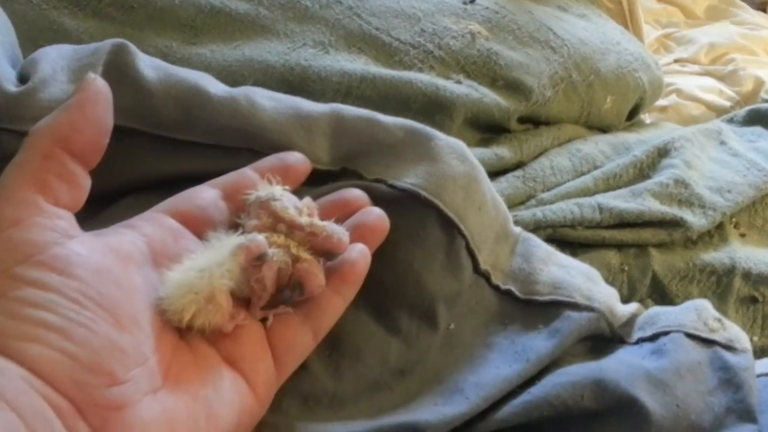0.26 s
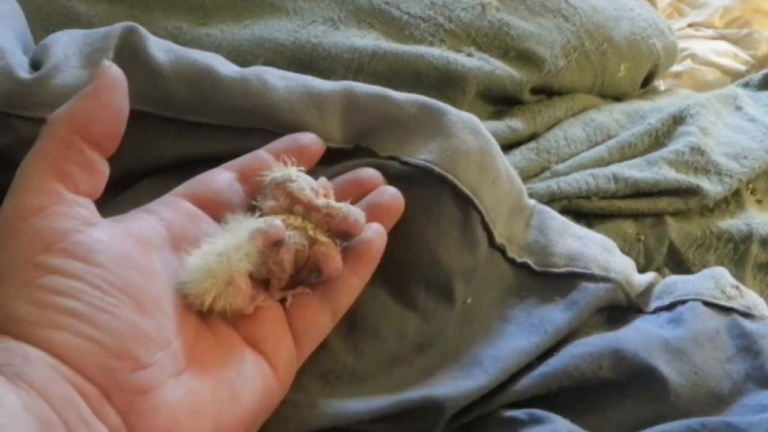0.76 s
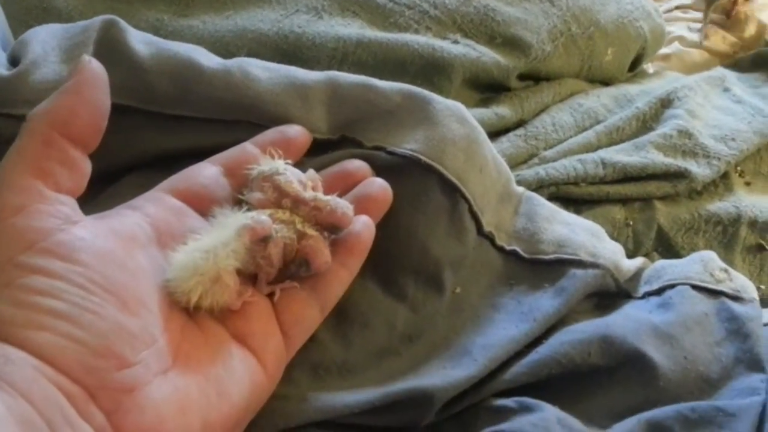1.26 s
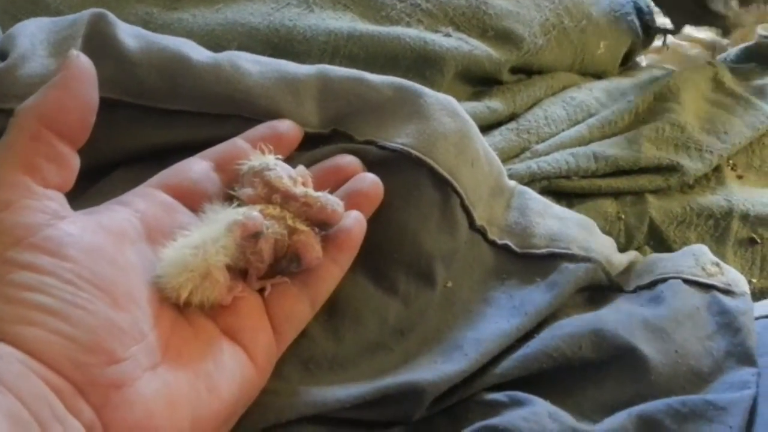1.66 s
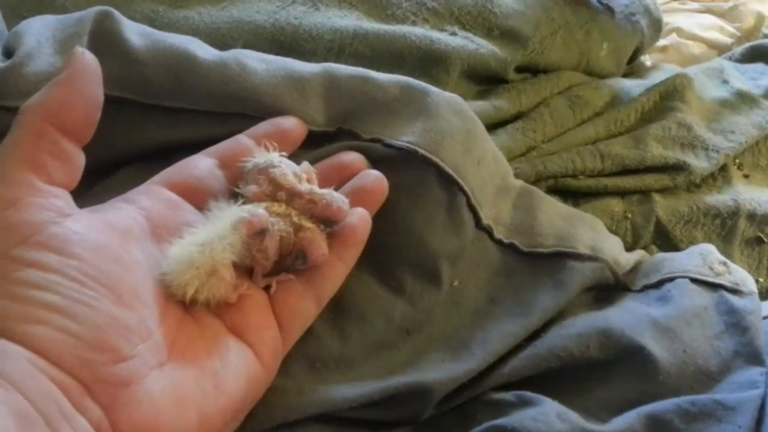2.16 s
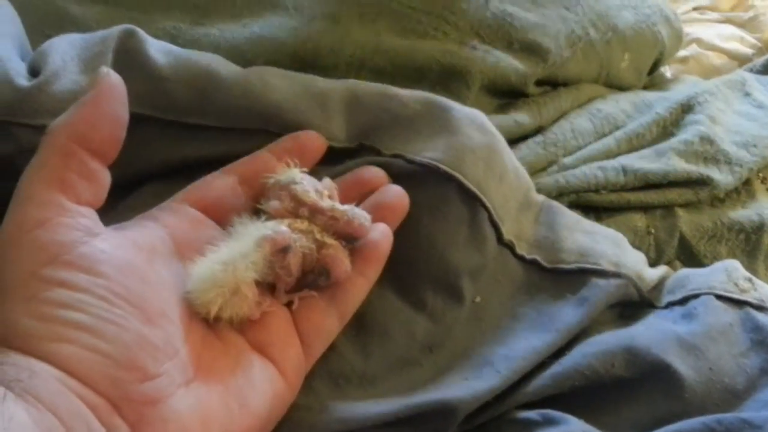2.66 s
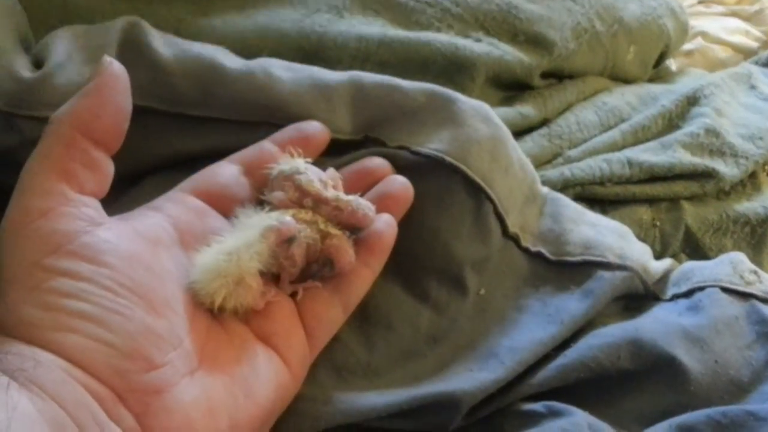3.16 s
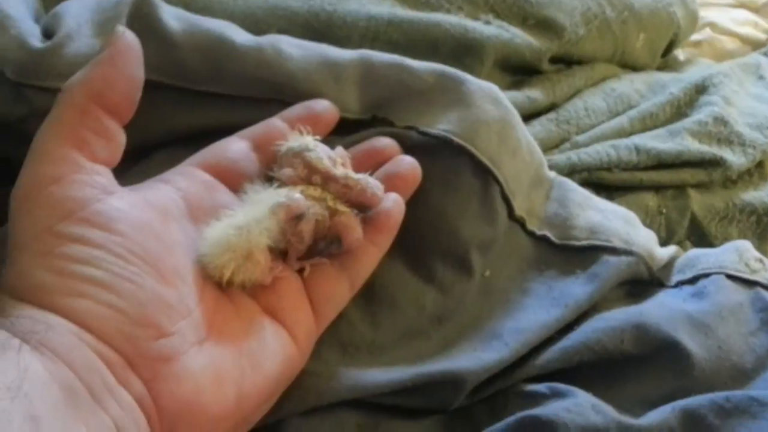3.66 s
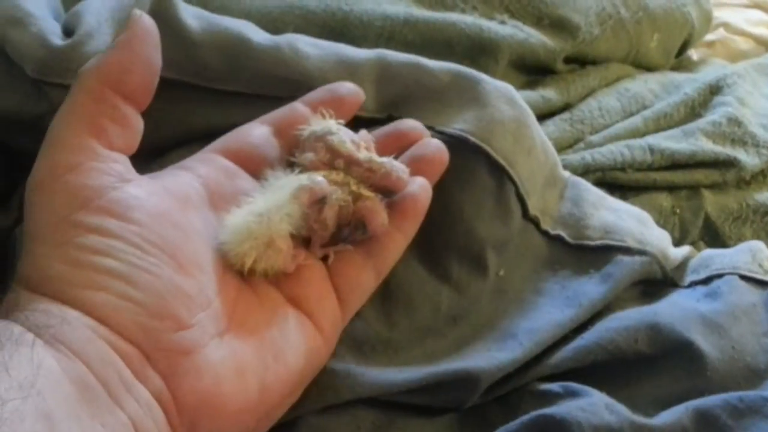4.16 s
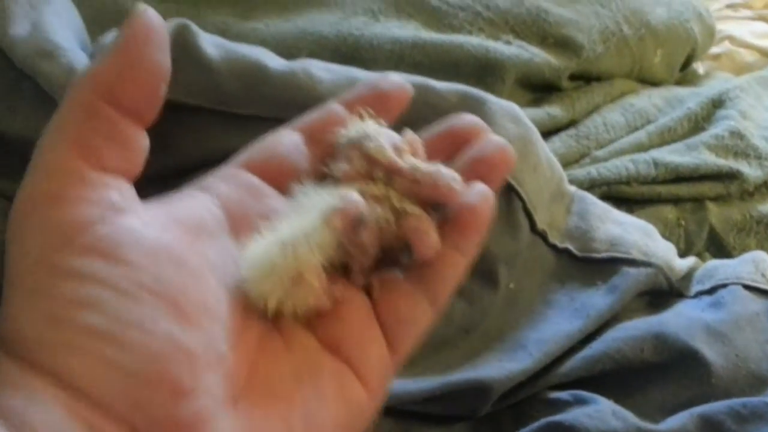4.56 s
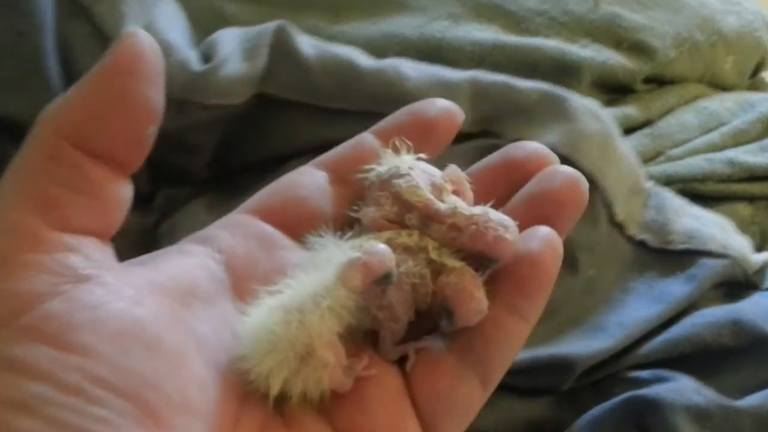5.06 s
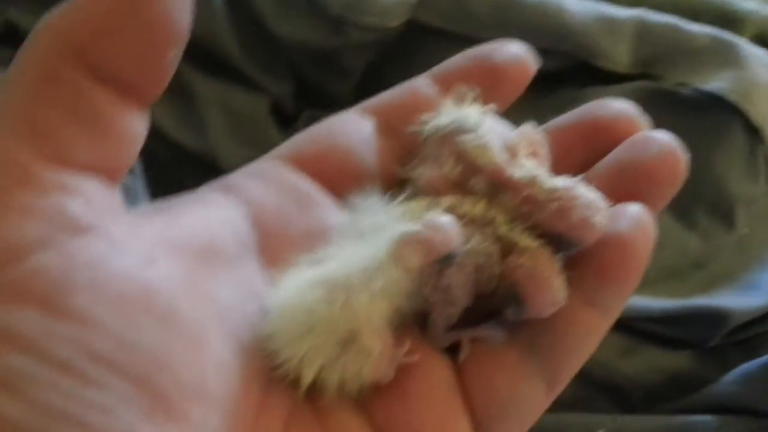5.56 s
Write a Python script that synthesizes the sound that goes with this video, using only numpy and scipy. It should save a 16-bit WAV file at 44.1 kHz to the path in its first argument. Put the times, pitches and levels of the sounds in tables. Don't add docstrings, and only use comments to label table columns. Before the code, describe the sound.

Tiny hatchlings chirp in a soft-furnished room. Light ticks and a brisk cloth rub come first, then two overlapping rising cheeps, followed by single stepped chirps, a close pair midway, a rougher squawk and a loud last call. Fabric then rustles near the handheld microphone. Low rumble swells with each sound and sinks between.

```python
import sys
import numpy as np
from scipy import signal
from scipy.fft import rfft, irfft, next_fast_len
from scipy.io import wavfile
from scipy.ndimage import uniform_filter1d, minimum_filter1d, map_coordinates

SR = 44100
rng = np.random.default_rng(int(sys.argv[2]) if len(sys.argv) > 2 else 0)


def waveform_to_disk(signal):
    frames = np.transpose(np.atleast_2d(signal))
    scaled = np.clip(frames, -1, 1) * 32767
    samples = np.round(scaled).astype(np.int16)
    wavfile.write(sys.argv[1], SR, samples)


def voltage_ratio(decibels):
    exponent = np.asarray(decibels, float) / 20
    return 10 ** exponent


N = 256614

# (frequency [Hz], density [dB per Hz])
RUMBLE_SPECTRUM = [(15, -45.5), (25, -23), (90, -4), (119, -7.5), (146, -5), (321, -2.5), (375, -2.5),
                   (682, -10.5), (1500, -17), (1950, -27.5), (3300, -120)]
# (frequency [Hz], density [dB per Hz])
HISS_SPECTRUM = [(2650, -39.5), (4500, -5.5), (6500, -4), (7010, 0.5), (7370, 1), (8750, -9), (14000, -17),
                 (14700, -15.5), (15000, -33)]
# (frequency [Hz], density [dB per Hz])
DULL_SPECTRUM = [(530, -36), (900, -5.5), (1370, -13.5), (1970, -2), (2160, -1.5), (2660, -3.5),
                 (5000, -4.5), (6500, -27.5), (11000, -120)]
# (frequency [Hz], correlation [-1 to 1])
LIKENESS = [(60, 0.66), (180, -0.025), (550, 0.16), (1650, -0.069), (4970, -0.51), (15000, 0.0)]
# (frequency [Hz], left minus right [dB])
NOISE_BALANCE = [(60, -4.5), (180, 2), (550, 3.5), (1650, 10), (4970, 2), (15000, -8)]
# (frequency [Hz], left minus right [dB])
BIRD_BALANCE = [(60, -12.5), (120, -3), (240, 1.5), (480, -1), (950, -10.5), (1890, 9.5), (3770, 9),
                (7520, -5), (15000, -21.5)]
# (frequency [Hz], t60 [s])
ROOM_DECAY = [(1500, 0.22), (2300, 0.27), (3100, 0.33), (4500, 0.27), (6000, 0.32), (10000, 0.17)]
# (time [s], level [dB])
HAND = [(0, -1), (.55, -2.5), (.7, 2.5), (1.2, 5), (1.5, 5.5), (1.9, -3.2), (2.3, 3.5), (2.7, -1),
        (3.35, -3.5), (3.62, 5.5), (4, -3.5), (4.3, -0.5), (4.5, -1.5), (5.1, -5), (5.62, 3.5), (5.78, 3)]
# (time [s], half width [s], level shift [dB])
BASS_DIPS = [
    (.8, .03, -28),
    (.85, 0.089, -20),
    (2.77, .035, -28.5),
    (2.82, 0.21, -17.5),
    (3.28, 0.057, -6),
    (4.63, 0.095, -13.5),
]
# (time [s], level [dB],
# dull far part over near hiss [dB])
CLOTH_MOVES = [(0, -62.5, 9.5), (.13, -64.5, 4.5), (.196, -83.5, .1), (1.3, -79.5, 13.5), (1.434, -71, 6),
               (1.52, -65.5, 9), (1.79, -80.5, -4.7), (4.13, -95, 8.5), (4.18, -62.5, -18),
               (4.29, -63.5, -29.5), (4.47, -54.5, -16), (4.96, -52, -16.5), (5.154, -50.5, -18.5),
               (5.206, -45.5, -10.5), (5.246, -52.5, -15.5), (5.456, -55.5, -16), (5.56, -60.5, -1.5),
               (5.819, -58.5, -2.5)]
# (time [s], peak level [dB], centre [Hz], left minus right [dB], t60 [s])
CLAW_TICKS = [(0.1271, -47.5, 1740, 11, 0.037), (0.2049, -42, 5500, 1.5, 0.012),
              (0.2889, -39, 1610, -4.5, 0.04), (0.3783, -45.5, 7100, -10.5, 0.036),
              (0.439, -46.5, 2890, -2, 0.032), (0.5079, -33.5, 6800, -13, 0.06),
              (1.8203, -43, 6760, 4, 0.0532), (1.8735, -42, 5070, 2.5, 0.014),
              (2.0289, -53, 3150, 5.5, 0.047), (2.4588, -37.5, 3030, 2, 0.028),
              (2.5157, -42, 6730, 1, 0.04), (4.0478, -41, 6880, -4.5, 0.058),
              (4.1788, -48, 7170, -14.5, 0.03), (4.251, -43.5, 6840, -1, 0.014),
              (5.1984, -43, 7130, -12, 0.028), (5.5792, -37.5, 5050, 10, 0.0144),
              (5.6494, -50, 5030, 15, 0.038), (5.7309, -45, 6900, 9, 0.027)]
# (frequency [Hz], level [dB], t60 [s])
WIRE_RING = [(5500, 0.5, 0.016), (8370, -5, 0.092), (11800, -15, 0.071), (3020, -16.5, 0.037)]
# (frequency [Hz], level [dB])
BEAK_COLOUR = [(1400, 0), (3000, -2), (4500, 2.5), (6000, -6), (7600, -7.5), (9000, -19), (10500, -35.5),
               (12500, -32), (15000, -49)]
# (start [s], first leap, high leap and drop after the start [s], lowest pitch [Hz])
STEPPED_CALLS = [
    (1.008, .029, .105, .157, 1600),
    (2.143, .038, .107, .159, 1640),
    (2.763, .032, .111, .162, 1600),
    (3.534, .021, .088, .131, 1600),
    (4.494, .029, .081, .147, 1750),
]
# (level [dB], slip after the first leap [Hz], top of the middle register [Hz],
# pitch held after the drop [Hz], level there [dB])
CALL_PHRASING = [
    (-3, 280, 2450, 2150, -3),
    (-4.5, 18, 2260, 2100, -1),
    (.1, 14, 2500, 2200, -0.5),
    (-0.07, 270, 2550, 2270, 4),
    (3, 120, 2400, 2480, -3),
]
# (level [dB], overtone strength [dB])
STAGE_LEVELS = [(-28, -11), (-25, -8), (-20, -5.5), (-26.5, -3.5), (-20, -10.5), (-18, -2), (-12.5, -5),
                (-16, -13.5), (-11.5, -12.5), (-19, -1.5), (-21.5, -10), (-21.5, -10.5), (-30.5, -5)]
STAGE_PITCH = [0, 1770, 2090, 2110, 2140, 0, 2950, 3085, 3115, 2500, 0, 0, 1800]
# (time [s], pitch [Hz], level [dB], overtone strength [dB])
CLIMB_CALL = [
    (.65, 1801, -18, -6),
    (.68, 2006, -17, -6.5),
    (0.729, 2469, -19, -12),
    (.745, 2725, -11, 2),
    (0.764, 3015, -22.5, -4.5),
    (.857, 3156, -23, -3),
    (.866, 3435, -15, 0.5),
    (.885, 3654, -21, 6.5),
    (0.926, 3585, -27.5, -8),
]
ANSWER_CALL = [
    (0.729, 1369, -26.5, -12),
    (.74, 1864, -26, 7.5),
    (0.777, 1950, -21, -2.5),
    (.792, 2120, -18.5, -3),
    (.815, 2590, -21.5, 2.2),
    (0.859, 2638, -35, 8),
    (0.899, 2932, -26.5, 1.6),
    (0.925, 2100, -24.5, 0),
]
ARCH_CALL = [
    (2.634, 1558, -27, -3.5),
    (2.662, 1878, -19.5, 1.5),
    (2.68, 2305, -18, -4),
    (2.718, 2363, -14.5, -9.5),
    (2.726, 2896, -14, -2.5),
    (2.76, 3264, -17, -13.5),
    (2.79, 3382, -16.5, -30),
    (2.82, 3196, -21, -13.5),
    (2.845, 2690, -11.5, -15.5),
]
SQUAWK_CALL = [
    (3.197, 1696, -22.5, 1.5),
    (3.23, 1630, -26.5, 0.5),
    (3.28, 2013, -17, 2),
    (3.3, 2322, -26, -1.5),
    (3.315, 2775, -15, -4.5),
    (3.35, 2841, -19, -19),
    (3.378, 2874, -17, -16),
    (3.392, 1855, -16, -2),
    (3.41, 1754, -42, 8),
]
FAR_CALL = [
    (-.06, 2300, -46, -8),
    (-.04, 2950, -42, -28),
    (-.01, 2700, -44.5, -6),
    (0, 2100, -63, 0.5),
]
PEEP_CALL = [
    (4.046, 4600, -47, 5),
    (4.051, 3600, -45, 13),
    (4.068, 3250, -52, 9),
]
# (roughness [0-1], third overtone [dB],
# loss per overtone above the third [dB], room [dB])
VOICES = [(.25, -6, .1, 4), (.25, 6.5, 4.5, 4), (.8, 0, -0.2, 3), (.45, -1.5, 0.5, 1.8), (.4, -5, 1, 0.7),
          (0.5, -3, -0.55, 2.1), (.5, -2.5, 0.6, 2.5), (.85, -8, 5.5, 0.5), (0.5, -2, 1, 0.5),
          (0.1, -8, .1, -7), (.45, 0.5, -0.5, 3.55)]


def unit(x):
    return x / np.sqrt(np.mean(x ** 2) + 1e-20)


def along(points, hz):
    f, v = np.transpose(points)
    return np.interp(np.log(hz + 1), np.log(f + 1), v)


def level(rows, axis=1):
    rows = np.transpose(rows)
    return voltage_ratio(np.interp(np.arange(N) / SR, rows[0], rows[axis]))


def wobble(rate, size=N):
    knots = rng.standard_normal(int(size * rate / SR) + 4)
    return map_coordinates(knots, [np.arange(size) * rate / SR])


def filtered(x, response):
    m = next_fast_len(x.shape[-1] + 8192)
    spectrum = rfft(x, m) * response(np.fft.rfftfreq(m, 1 / SR))
    return irfft(spectrum, m)[..., :x.shape[-1]]


def lean(x, balance):
    return filtered(x, lambda hz: voltage_ratio(along(balance, hz) * np.array([[.5], [-.5]])))


def rush(spectrum, patchy_db):
    z = signal.stft(rng.standard_normal((2, N)), nperseg=512)[2]
    patches = uniform_filter1d(rng.standard_normal(z.shape[1:]), 6, 0)
    patches = uniform_filter1d(patches, 10, 1)
    pair = signal.istft(z * voltage_ratio(patchy_db * unit(patches)), nperseg=512)[1][:, :N]

    def mid_side(hz):
        turn = np.arccos(np.clip(along(LIKENESS, hz), -1, 1)) / 2
        return voltage_ratio(along(spectrum, hz)) * [np.cos(turn), np.sin(turn)]

    mid, side = filtered(pair, mid_side)
    return unit(lean(np.array([mid + side, mid - side]), NOISE_BALANCE))


def add(mix, x, wet_db, gap, s):
    hz, t, z = signal.stft(rng.standard_normal((2, SR // 2)), SR, nperseg=256)
    tail = signal.istft(z * voltage_ratio(-60 * t / along(ROOM_DECAY, hz)[:, None]), SR, nperseg=256)[1]
    after = np.arange(tail.shape[1])
    tail *= np.clip(after / (gap * SR), 0, 1) ** 2
    tail *= 1 + 1.7 * voltage_ratio(-60 * after / (.09 * SR))
    tail *= voltage_ratio(wet_db) / np.linalg.norm(tail[0])
    tail[[0, 1], [0, 12]] = 1
    both = signal.fftconvolve(np.atleast_2d(x), tail, axes=1)
    start = SR + round(s * SR)
    mix[:, start:start + both.shape[1]] += both


def floor(heard, hiss, dull):
    gate_s, gate_hz, shut_db, open_db = 0.024, 3760, -85, -39
    sensed = filtered(heard, lambda hz: 1 / np.hypot(1, hz / gate_hz))
    power = uniform_filter1d((sensed ** 2).mean(0), size=round(gate_s * SR))
    power_db = 10 * np.log10(np.abs(power) + 1e-12)
    opening = np.clip((power_db - shut_db) / (open_db - shut_db), 0, 1)

    def through(low_db, high_db):
        return voltage_ratio(low_db + (high_db - low_db) * opening)

    hum = voltage_ratio(-8 + 2 * wobble(6)) * np.sin(2 * np.pi * 120 * np.arange(N) / SR)
    unrest = level(HAND) * voltage_ratio(2.2 * wobble(5.5) + 0.71 * wobble(21))
    rumble = through(-72.5, -55) * unrest * (rush(RUMBLE_SPECTRUM, patchy_db=2.5) + hum)
    return rumble + through(-79, -53) * hiss + through(-76, -54.5) * dull


def cloth(hiss, dull):
    rub_s, rub_db, rub_dull_db, hold_s, release_s = .508, -35, -13, .02, .1
    late = np.arange(N) / SR - rub_s
    rub = (late > 0) * voltage_ratio(rub_db - 30 * np.clip(late - hold_s, 0, None) / release_s)
    slow = level(CLOTH_MOVES) * voltage_ratio(0.61 * wobble(22))
    far = slow * level(CLOTH_MOVES, axis=2) + rub * voltage_ratio(rub_dull_db)
    return (slow + rub) * hiss + far * dull


def ticks():
    mix = np.zeros((2, N + 3 * SR))
    t = np.arange(SR // 5) / SR
    for k, (s, db, hz, pan_db, t60) in enumerate(CLAW_TICKS):
        def colour(f):
            return (0.29 + 1 / np.hypot(1, (f - hz) / 1500)) * f ** 2 / (f ** 2 + 1500 ** 2)

        puff = unit(filtered(rng.standard_normal(len(t)), colour)) * voltage_ratio(-60 * t / t60)
        if k == 1:
            for f, ring_db, ring_s in WIRE_RING:
                puff += 3.6 * voltage_ratio(ring_db - 60 * t / ring_s) * np.sin(2 * np.pi * f * t)
        pan = pan_db * np.array([[.5], [-.5]])
        add(mix, puff * voltage_ratio(db - 10.5 + pan), wet_db=7.0, gap=0.0013, s=s)
    return mix[:, SR:SR + N]


def stepped(s, first, leap, drop, low_hz, db, slip_hz, middle_hz, tail_hz, tail_db):
    leap_s, slip_s, settle_s, fade_s, call_s = .007, .009, .014, .011, .2
    landed = first + leap_s
    after = [0, first, landed, landed + slip_s, landed + 2 * slip_s,
             leap, leap + leap_s, leap + leap_s + settle_s,
             drop, drop + leap_s, drop + leap_s + settle_s, call_s - fade_s, call_s]
    stages = np.column_stack([s + np.array(after), STAGE_PITCH, np.add(STAGE_LEVELS, [db, 0])])
    stages[[0, 3, 5, 10, 11], 1] += [low_hz, -slip_hz, middle_hz, tail_hz, tail_hz]
    stages[9:, 2] += tail_db
    return stages


def voice(call, rough, third_db, loss_db):
    s, hz, db, over_db = np.transpose(call)
    t = np.arange(s[0], s[-1], 1 / SR)
    size = len(t)
    breath_db = -28 + 15 * rough
    glide = uniform_filter1d(np.interp(t, s, hz), size=70)
    low = np.clip((1880 - glide) / 100, 0, 1)
    steadiness = np.where(glide > 3000, .6, 1)
    pitch = glide * (1 + .045 * rough * steadiness * wobble(260, size=size))
    phase = 2 * np.pi * np.cumsum(pitch) / SR
    tilt_db = -1.5 + 9 * np.clip(pitch / 1000 - 1.9, 0, None)
    tone = np.sin(phase) * voltage_ratio(along(BEAK_COLOUR, pitch))
    for k in range(2, 9):
        over = np.interp(t, s, over_db) - tilt_db * min(k - 2, 2)
        over += along(BEAK_COLOUR, k * pitch) + 4.0 * wobble(45, size=size)
        if k == 2:
            over -= 5 * low
        if k == 3:
            over += third_db + 10 * low
        over -= loss_db * max(k - 3, 0)
        if k == 2:
            over += 0
        fray = 1 + voltage_ratio(breath_db + 3.5 * k) * wobble(1500, size=size)
        tone += voltage_ratio(over) * unit(fray) * np.sin(k * phase) * (k * pitch < SR / 2)
    tone *= 1 + voltage_ratio(breath_db) * wobble(2200, size=size)
    edge = np.clip(np.minimum((t - s[0]) / 0.0062, (s[-1] - t) / 0.0034), 0, 1)
    swing_db = 2.6 * rough * wobble(149.2, size=size)
    return edge * tone * voltage_ratio(np.interp(t, s, db) + swing_db)


def whistles():
    mix = np.zeros((2, N + 3 * SR))
    calls = [stepped(*row, *way) for row, way in zip(STEPPED_CALLS, CALL_PHRASING)]
    calls += [FAR_CALL, CLIMB_CALL, ANSWER_CALL, ARCH_CALL, SQUAWK_CALL, PEEP_CALL]
    calls = sorted(calls, key=lambda c: c[0][0])
    for call, (rough, third_db, loss_db, room_db) in zip(calls, VOICES):
        add(mix, voice(call, rough, third_db, loss_db), wet_db=room_db, gap=0.0053, s=call[0][0])
    small = filtered(mix[:, SR:SR + N], lambda f: 1 / (1 + (1400 / (f + 1)) ** 12))
    return lean(small, BIRD_BALANCE)


def gated(x, open_db, slope):
    power = uniform_filter1d((x ** 2).mean(0), size=1500)
    db = 10 * np.log10(np.abs(power) + 1e-12)
    return x * voltage_ratio(np.clip(slope * (db - open_db), -30, 0))


def scene():
    hiss = rush(HISS_SPECTRUM, patchy_db=2.5)
    dull = rush(DULL_SPECTRUM, patchy_db=4.0)
    heard = gated(whistles(), open_db=-42, slope=0.346) + ticks() + cloth(hiss, dull)
    return heard + floor(heard, hiss, dull)


def limited(x, top):
    need = np.minimum(1, top / (np.abs(x).max(0) + 1e-9))
    return x * uniform_filter1d(minimum_filter1d(need, size=400), size=400)


def thinned(x, reach_db, scatter_db):
    _, t, z = signal.stft(x, SR, nperseg=1024)
    power = (np.abs(z[:, :512]) ** 2).reshape(2, 64, 8, -1).mean(2)
    bands = 10 * np.log10(power + 1e-20)
    luck = uniform_filter1d(rng.standard_normal(bands.shape[1:]), size=5, axis=1)
    bands[:, 0] += 15
    bands[:, 28:] -= 8
    bands[:, :4] += sum(db * np.exp(-((t - s) / half) ** 4) for s, half, db in BASS_DIPS)
    keep = bands > bands.max(1, keepdims=True) - reach_db + scatter_db * unit(luck)
    z[:, :512] *= np.repeat(np.maximum(keep, voltage_ratio(-33.5)), 8, axis=1)
    return signal.istft(z, nperseg=1024)[1][:, :N]


def band_limit(x):
    return signal.sosfilt(signal.butter(12, 15710, fs=SR, output="sos"), x)


def record(dry):
    x = limited(dry, top=.93)
    x = filtered(x, lambda hz: hz < 14800)
    return band_limit(thinned(x, reach_db=48, scatter_db=7.0))


dry = scene()
out = record(dry)
waveform_to_disk(out)
```